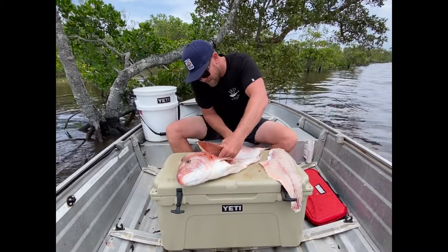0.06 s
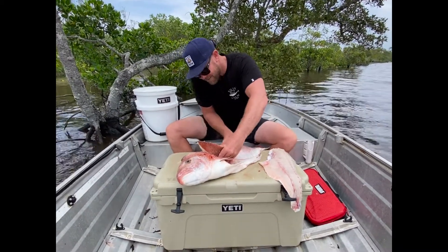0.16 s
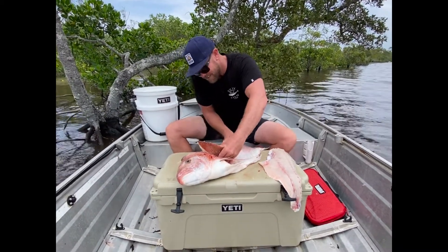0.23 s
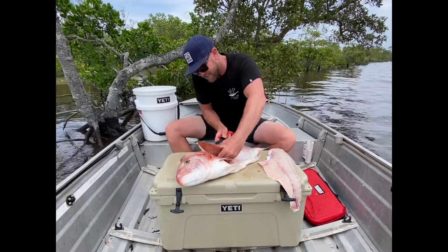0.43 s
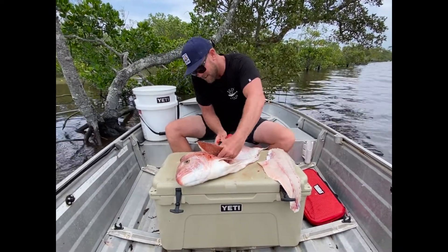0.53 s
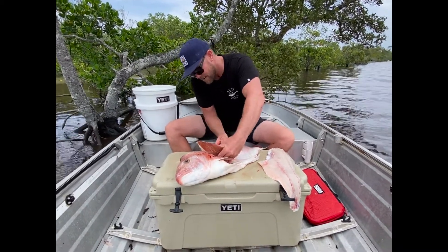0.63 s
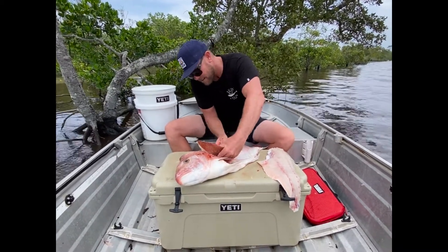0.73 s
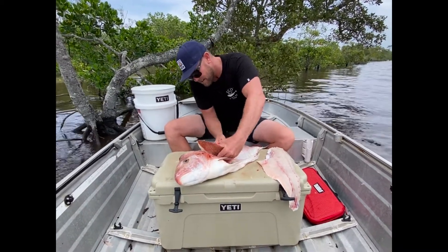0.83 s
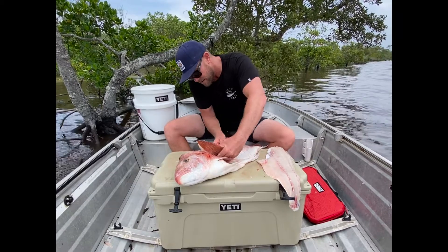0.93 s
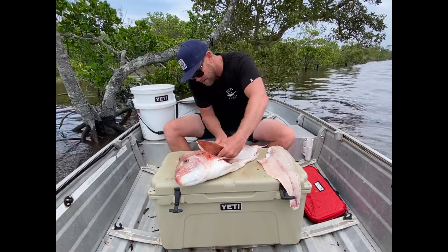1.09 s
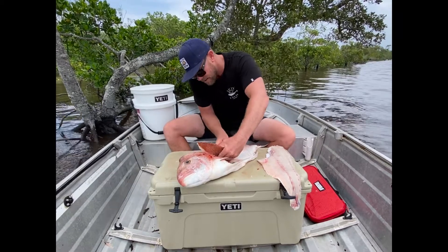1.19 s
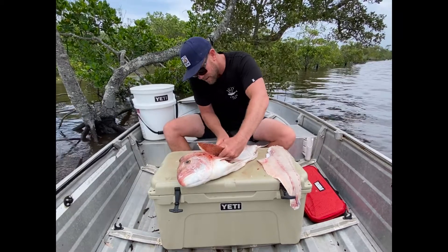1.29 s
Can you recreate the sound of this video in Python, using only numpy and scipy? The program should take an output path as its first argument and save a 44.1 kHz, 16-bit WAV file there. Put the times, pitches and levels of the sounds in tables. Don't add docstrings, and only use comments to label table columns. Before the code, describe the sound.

A fillet knife works on a fish over a hollow plastic box: an early crunchy bone crack and snap, low thuds, then sparse ticks and light scrapes, faint water and leaves outdoors, close phone microphone.

```python
import sys
import numpy as np
from scipy import signal
from scipy.fft import rfft, irfft
from scipy.io import wavfile
from scipy.ndimage import uniform_filter1d

SR = 44100
rng = np.random.default_rng(int(sys.argv[2]) if len(sys.argv) > 2 else 0)


def transcribe(signal):
    frames = np.atleast_2d(signal).T
    limited = np.clip(frames, -1, 1)
    pcm = np.round(limited * 32767).astype(np.int16)
    wavfile.write(sys.argv[1], SR, pcm)


def amplitude_ratio(level_db):
    exponent = np.asarray(level_db, float) / 20
    return 10 ** exponent


N = 59535

# (time [s], level [dB])
LID_PRESSURE = [(0.0, -49), (0.164, -70), (0.198, -65), (0.214, -68), (0.232, -51), (0.25, -29.5),
                (0.288, -45.5), (0.334, -53.5), (0.376, -34.5), (0.436, -38.5), (0.462, -58.5),
                (0.53, -46.5), (0.676, -69), (1.124, -65.5), (1.172, -61.5), (1.262, -67.5), (1.286, -59.5),
                (1.35, -66)]
# (frequency [Hz], width [Hz], level [dB])
LID_MODES = [(84.2, 26, -9), (109, 34, -5), (171, 46, -0.5), (280, 97, 0), (433, 59, -4), (532, 120, -2.5),
             (750, 320, -27)]
# (time [s], level [dB], ring [Hz], decay by 60 dB [s])
LID_THUDS = [(.006, -50.5, 519, 0.041), (0.048, -52, 182, 0.056), (0.248, -63, 85, 0.12),
             (0.346, -44, 280, .06), (.367, -51.5, 109, 0.11), (.371, -36.5, 121, 0.13),
             (.372, -46, 430, .08), (.364, -50, 560, .06), (.42, -47, 600, .07), (.424, -48, 300, .05),
             (.444, -50, 220, .08), (.455, -56, 430, .1), (.405, -44, 493, 0.057), (0.419, -39, 120, 0.07),
             (.475, -52, 140, 0.06), (.47, -56, 80.6, .08), (0.541, -57.5, 80.5, 0.14),
             (0.542, -56.5, 520, 0.041), (0.803, -62, 92, 0.069), (0.94, -57, 328, 0.098),
             (1.015, -67, 101.9, 0.041), (1.164, -47, 401, 0.11), (1.188, -51, 318, 0.1),
             (1.205, -49.5, 298, 0.075), (1.281, -54, 530, 0.03), (.25, -44, 230, .1),
             (.095, -58, 150, .12), (.01, -58, 185, .08)]
# (frequency [Hz], gain [dB])
LID_COMB = [(900, 0), (1400, 1), (2100, 0), (2800, -4), (3500, 1), (4500, 1), (5500, 0)]
# (frequency [Hz], density [dB per Hz])
WATER_SPECTRUM = [(24, -75), (40, -45.5), (297, -2), (377, -17), (446, 2), (539, -14), (653, -22.5),
                  (869, -14.5), (12000, -57), (15600, -81), (22000, -120)]
# (time [s], level [dB])
RUSTLE_SWELL = [
    (0, 11),
    (.15, 9),
    (0.449, 10.5),
    (0.651, 7),
    (.75, 4),
    (1.05, 5.2),
    (1.2, 9.5),
    (1.35, 11),
]
# (start [s], length [s], level [dB], brightest [Hz], rise [s])
SCRAPES = [(.003, 0.048, -75, 3750, 0.0021), (.06, 0.021, -67, 4340, 0.012),
           (0.18, 0.038, -53, 14300, 0.012), (.245, 0.02, -51, 11800, 0.001),
           (0.299, 0.009, -51.5, 8000, 0.0011), (0.33, 0.012, -61, 8500, .003),
           (0.587, 0.05, -66, 1936, .01), (0.634, 0.012, -79, 8300, .002),
           (0.835, 0.028, -70, 7500, 0.0023), (.40, .17, -79, 5800, 0.1), (1.05, 0.14, -64.5, 4800, 0.18),
           (1.153, 0.02, -57, 7200, .006), (1.177, 0.052, -66.5, 4850, 0.0039),
           (1.267, 0.031, -55.5, 11000, .012), (1.3, 0.022, -60, 5500, 0.0095)]
# (frequency [Hz], density [dB per Hz])
SCRAPE_SPECTRUM = [(200, -15.5), (500, -1), (1200, 0.5), (2200, -3), (3800, -5), (6000, -12), (9000, -24.5),
                   (15500, -38.5)]
# (time [s], level [dB],
# frequency [Hz], held [s])
HELD_TONES = [(.328, -48, 1630, .008), (.329, -58, 3380, .014), (.329, -54, 4130, .014),
              (.329, -55, 4810, .012), (.331, -62, 5470, .01), (.331, -63, 6940, .006),
              (.329, -74, 8380, .008), (.331, -86, 12000, .002), (.3, -62, 5580, .004),
              (.3, -68, 6780, .004), (.3005, -68, 8500, .002), (1.278, -59, 1020, .02),
              (1.278, -63, 1910, .022), (1.276, -64, 2620, .02), (1.276, -65, 2890, .02),
              (1.276, -63, 4190, .016), (1.28, -57, 533, .02), (.181, -74, 8700, .003),
              (.835, -60, 2150, .006), (.826, -76, 5000, .008), (1.065, -75, 3550, .004),
              (1.165, -62, 1900, .016), (1.156, -72, 5800, .014), (.04, -82, 5000, .004),
              (.075, -77, 3400, .008), (.255, -50, 660, .022), (.3, -53, 684, .012),
              (.974, -60, 4300, .004), (.02, -76, 1350, .09), (.03, -84, 3600, .03),
              (.231, -45, 4800, .004), (.232, -44, 2750, .006), (.887, -76, 2000, .018),
              (1.207, -70, 7000, .003), (1.255, -80, 7800, .003), (.81, -80, 3500, .003)]
# (time [s], level [dB], ring [Hz], width [Hz],
# chatter [s])
BONE_TICKS = [(.069, -74, 4380, 402, 0.0056), (0.158, -68, 1846, 350, 0.012),
              (0.181, -58, 4400, 1100, 0.001), (0.299, -48, 2040, 950, 0.0046),
              (.3005, -58, 687, 198, .012), (0.3283, -54, 1634, 255, 0.013), (0.328, -54, 4300, 2000, .014),
              (0.369, -61, 3700, 690, 0.0017), (0.403, -64, 1400, 303, 0.012),
              (0.493, -67, 4390, 600, 0.0053), (0.6745, -58, 1496, 333, 0.006),
              (0.8367, -62, 2310, 523, 0.0067), (.8355, -55.5, 5000, 750, 0.0084),
              (0.8352, -65, 7200, 900, 0.0058), (0.839, -63, 3570, 490, 0.01),
              (0.888, -78, 1940, 303, 0.017), (0.974, -54, 3900, 1050, 0.005),
              (1.0265, -78, 5360, 605, 0.00075), (1.0413, -66.5, 4370, 710, .001),
              (1.1597, -51, 1735, 497, .012), (1.159, -54, 3900, 950, 0.0068),
              (1.208, -65, 4930, 594, 0.0024), (1.206, -68, 7070, 2540, .005),
              (1.2389, -63.5, 4070, 1480, 0.013),
              (0.1172, -69, 1035, 353, 0.012), (.265, -63, 3020, 1190, 0.0031),
               (0.2998, -50, 3700, 1830, 0.0074), (0.332, -68, 7000, 1500, 0.0036),
               (1.041, -85, 6500, 2500, 0.001), (1.051, -79.5, 1450, 390, 0.016),
               (1.316, -68, 3500, 350, 0.0034), (1.245, -70.5, 1450, 388, 0.011),
               (1.254, -66, 3420, 720, 0.0062), (1.255, -80, 5900, 700, .004),
               (1.337, -74, 6000, 1100, .003)]
# (frequency [Hz], density [dB per Hz])
CRACK_SPECTRUM = [(200, -23.5), (400, -9.5), (700, -2.5), (1500, -6), (2800, -6), (5000, -8.5),
                  (7000, -22.5), (15500, -42.5)]
# (frequency [Hz], level [dB])
RIB_MODES = [(442, -9), (499, 3), (565, -2.5), (685, 5), (893, -24), (1023, -12), (1233, -3), (1500, -13),
             (1701, -6), (1776, -9), (2590, -8.5), (3270, -17), (4345, -15.5), (5372, -13.5)]
# (frequency [Hz], level [dB], decay by 60 dB [s])
FREE_BLADE = [(4910, -65.5, 0.15)]


def level(x, db):
    return x * amplitude_ratio(db) / np.sqrt(np.mean(x ** 2) + 1e-30)


def ring(x, hz, width):
    hz = min(hz, .45 * SR)
    return signal.lfilter(*signal.iirpeak(hz, hz / max(width, 5), SR), x)


def band(x, hz, width, order=3):
    edges = np.clip([hz - width / 2, hz + width / 2], 20, .45 * SR)
    return signal.sosfilt(signal.butter(order, edges, "band", fs=SR, output="sos"), x)


def colour(table, hz):
    table = np.array(table)
    return np.interp(np.log(hz), np.log(table[:, 0]), table[:, 1])


def shade(x, db_of):
    hz = np.maximum(np.arange(len(x) // 2 + 1) * SR / len(x), 10)
    return irfft(rfft(x) * amplitude_ratio(db_of(hz)), len(x))


def grit(size, rough_db):
    strength_db = rough_db * np.minimum(rng.exponential(size=size), 3)
    return level(rng.standard_normal(size) * amplitude_ratio(strength_db), 0)


def walk(rate):
    k = int(SR / rate)
    steps = np.repeat(rng.standard_normal(N // k + 1), k)
    return 1.7 * uniform_filter1d(uniform_filter1d(steps, k), k)[:N]


def gate(t, rise, hold, fall):
    return np.clip(t / rise, 0, 1) * np.exp(-np.maximum(t - hold, 0) / fall)


def add(out, x, s):
    i = max(int(s * SR), 0)
    out[i:i + len(x)] += x[:N - i]


def lid():
    press = np.array(LID_PRESSURE)
    slips = grit(N, 4.0) * amplitude_ratio(1.95 * walk(60))
    body = 0
    for hz, width, db in LID_MODES:
        mode = ring(ring(slips, hz, width), hz, 2 * width)
        body = body + amplitude_ratio(db) * level(mode, 0)
    pressure_db = np.interp(np.arange(N) / SR, press[:, 0], press[:, 1])
    out = level(body, -12) * amplitude_ratio(pressure_db)
    t = np.arange(8000) / SR
    contact_cycles = 0.36
    for s, db, hz, t60 in LID_THUDS:
        push = np.clip(t * hz / contact_cycles, 0, 1)
        add(out, amplitude_ratio(db - 60 * t / t60) * push * np.sin(2 * np.pi * hz * t), s)
    return out


def water():
    out, swell = 0, np.array(RUSTLE_SWELL)
    for hz in 45 * 2 ** np.arange(0, 8.1, .5):
        noise = ring(ring(grit(N, 1.6), hz, hz / 2), hz, hz / 2)
        noise = level(noise, colour(WATER_SPECTRUM, hz) + 10 * np.log10(hz))
        out = out + noise * amplitude_ratio(2.0 * walk(18.83))
    swell_db = np.interp(np.arange(N) / SR, swell[:, 0], swell[:, 1])
    return level(out, -76.5) * amplitude_ratio(swell_db)


def scrapes():
    out, t = np.zeros(N), np.arange(8000) / SR
    for s, hold, db, top_hz, rise in SCRAPES:
        def spectrum_db(hz):
            return colour(SCRAPE_SPECTRUM, hz) - 10 * np.log10(1 + (hz / top_hz) ** 8)

        slips = grit(len(t), 2.3) * amplitude_ratio(1.3 * walk(230)[:len(t)])
        x = level(shade(slips, spectrum_db), db)
        add(out, x * gate(t, rise, hold, .006), s)
    return out


def held_tones():
    out, t = np.zeros(N), np.arange(4000) / SR
    for s, db, hz, held in HELD_TONES:
        waver = .9 * walk(400)[:len(t)]
        wobble_db = 3.5 * walk(300)[:len(t)]
        tone = np.sin(2 * np.pi * (hz * t + rng.random()) + waver)
        add(out, tone * amplitude_ratio(db + wobble_db) * gate(t, .0015, held, .004), s)
    return out


def ticks():
    out, t = np.zeros(N), np.arange(6000) / SR
    bounce_s, bounce_db = 0.0061, -18
    for s, db, hz, width, chatter in BONE_TICKS:
        slips = grit(len(t), 2.4) * np.sqrt(width / SR) * 2
        chatter_db = -5 - 6.5 * np.minimum(t / chatter, 1)
        push = slips * amplitude_ratio(chatter_db) * gate(t, 0.00037, chatter, 0.0032)
        push[8] += 1
        push[int(bounce_s * SR)] += amplitude_ratio(bounce_db)
        spot = ring(band(push, hz, 1.5 * width, order=4), hz, width)
        gain = amplitude_ratio(db + 4.5) * SR / width / 2
        add(out, spot * gain, s - 0.54 / width)
    return out


def crack():
    t, x = np.arange(6000) / SR, 0

    def envelope(hz):
        rise = .004 + .008 * max(np.log2(1200 / hz), 0)
        hold = .028 - .003 * np.log2(hz / 1000)
        return gate(t, rise, hold, .0045)

    splinters = level(shade(grit(len(t), 1.6), lambda hz: colour(CRACK_SPECTRUM, hz)), -31)
    for hz in 250 * 2 ** np.arange(0, 6.1, .5):
        x = x + band(splinters, hz, hz * .35) * envelope(hz)
    for hz, db in RIB_MODES:
        wobble_db = 2.5 * walk(120)[:len(t)]
        tone = np.sin(2 * np.pi * (hz * t + rng.random()))
        x = x + amplitude_ratio(-37 + db + wobble_db) * tone * envelope(hz)
    out = np.zeros(N)
    add(out, x, .2192)
    return out


def snap():
    snap_s, width_s = .2998, .00008
    return -amplitude_ratio(-34) * np.exp(-((np.arange(N) / SR - snap_s) / width_s) ** 2)


def free_blade():
    out, t = np.zeros(N), np.arange(6000) / SR
    for hz, db, t60 in FREE_BLADE:
        x = ring(band(grit(len(t), 2.5), hz, 620.0), hz, 330.)
        add(out, x * amplitude_ratio(db + 18 - 60 * t / t60), .836)
    return out


def hull(knife):
    t = np.arange(12000) / SR
    t60_s, dull_hz, echo_db = 0.15, 3500, -19.5
    echo = signal.lfilter(*signal.butter(1, dull_hz, fs=SR), rng.standard_normal(len(t)))
    echo = echo * amplitude_ratio(-60 * t / t60_s) * (t > .003)
    return signal.fftconvolve(knife, echo * amplitude_ratio(echo_db) / np.sqrt(np.sum(echo ** 2)))[:N]


def scene():
    def comb(hz):
        return colour(LID_COMB, hz)

    box = lid()
    background = shade(water(), lambda hz: comb(hz) / 2)
    knife = shade(scrapes(), comb) + ticks() + crack() + free_blade()
    return (box + background + knife + hull(knife) + held_tones() + snap())[None]


def band_limit(x):
    return signal.sosfilt(signal.butter(12, 15630, fs=SR, output="sos"), x)


def record(dry):
    x = signal.sosfilt(signal.butter(3, 55, "high", fs=SR, output="sos"), dry)
    mix = x + amplitude_ratio(-112) * rng.standard_normal(dry.shape)
    return band_limit(mix)


dry = scene()
out = record(dry)
transcribe(out)
```